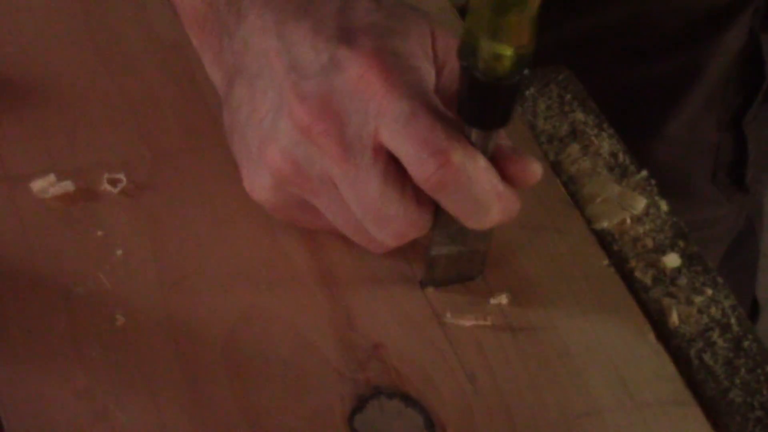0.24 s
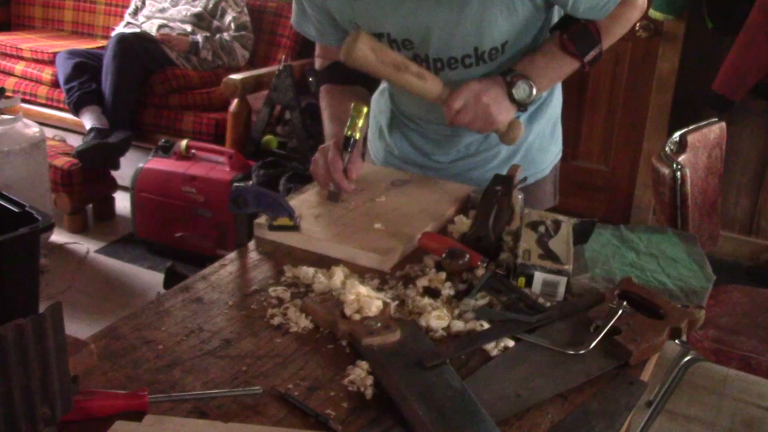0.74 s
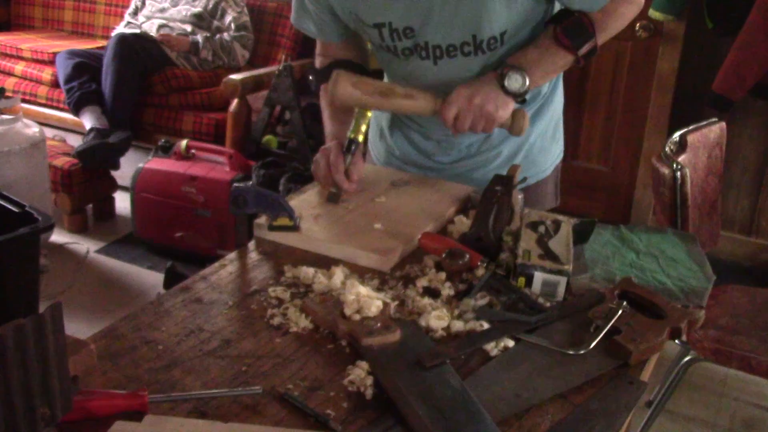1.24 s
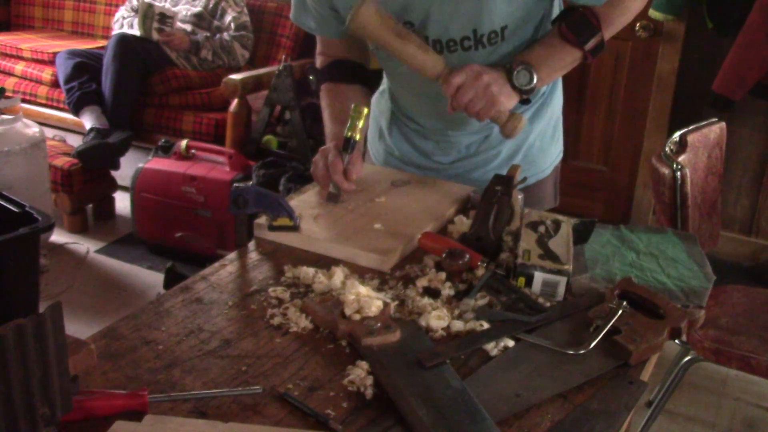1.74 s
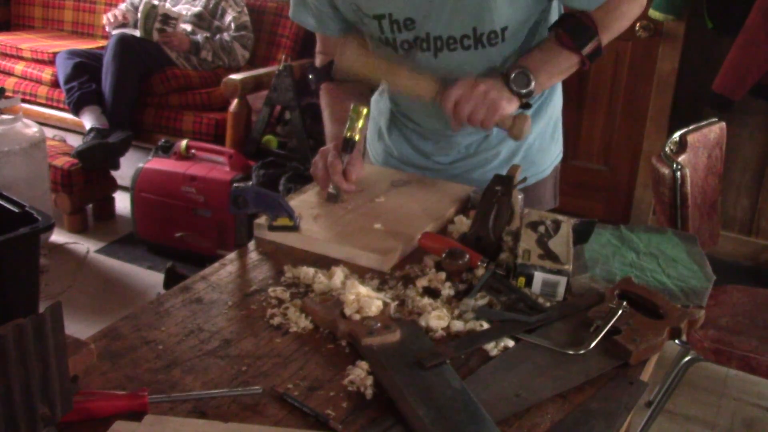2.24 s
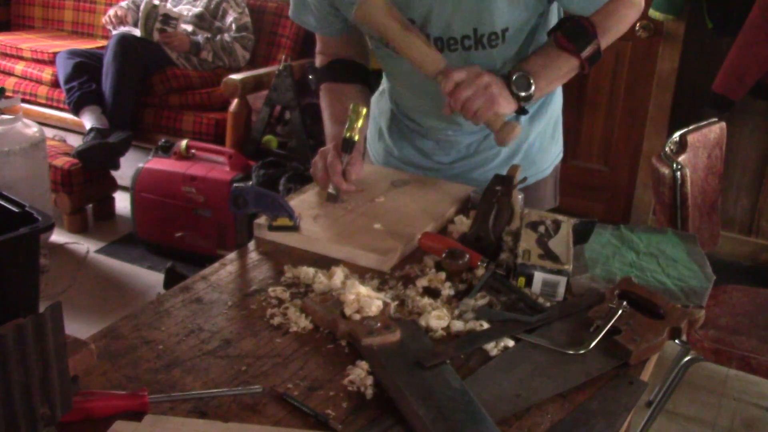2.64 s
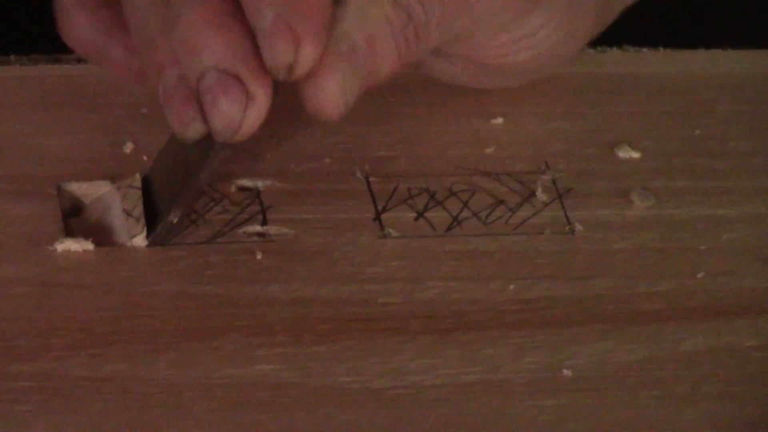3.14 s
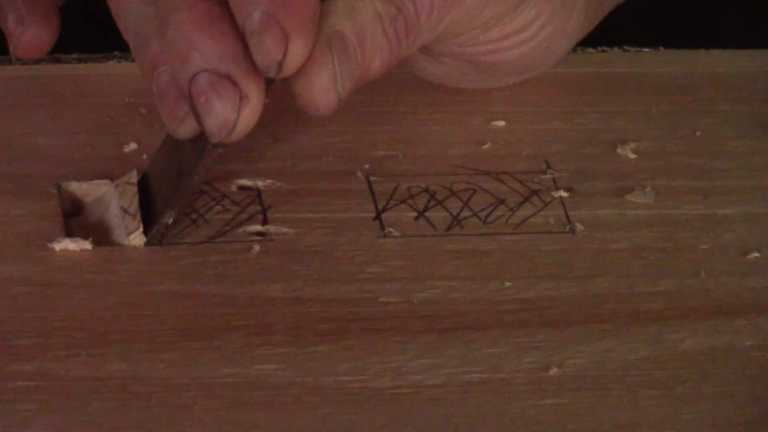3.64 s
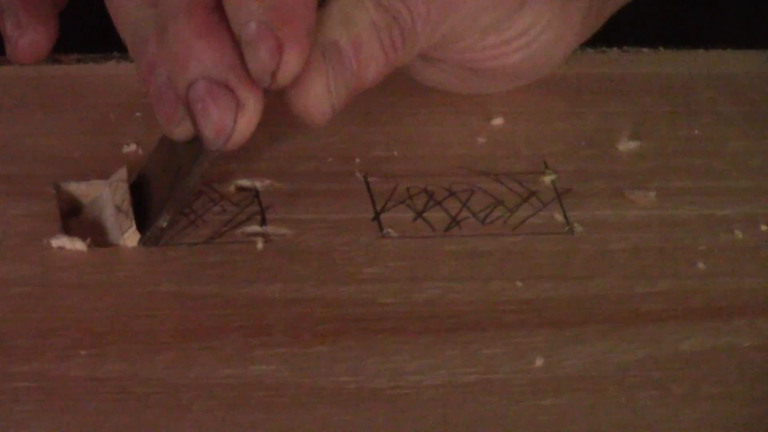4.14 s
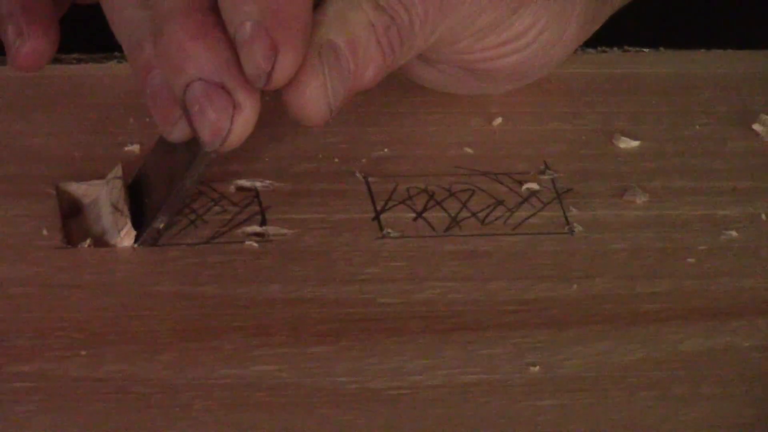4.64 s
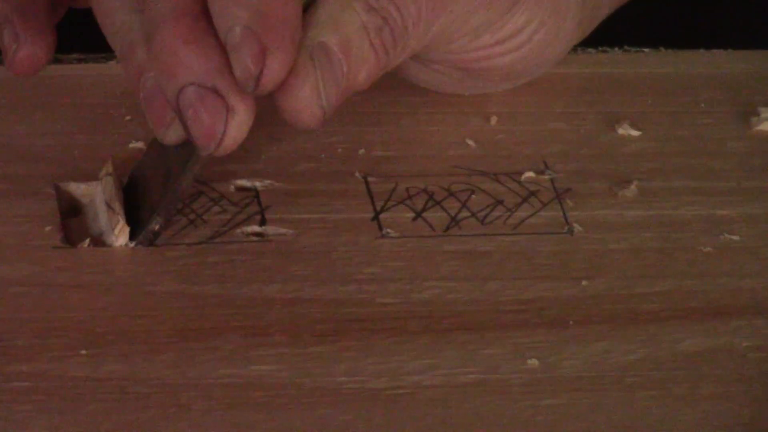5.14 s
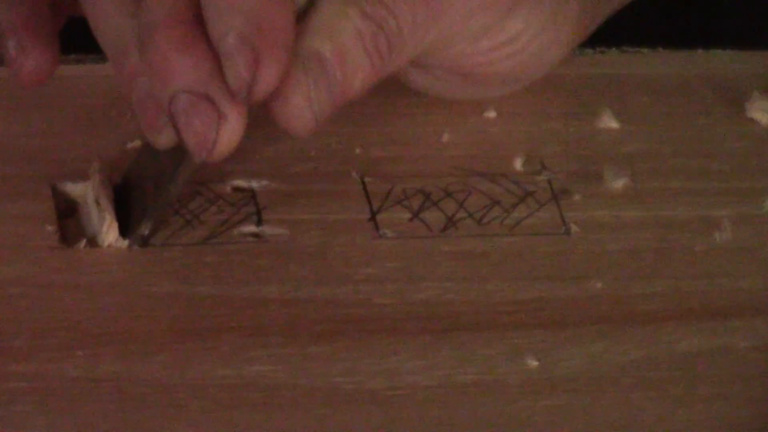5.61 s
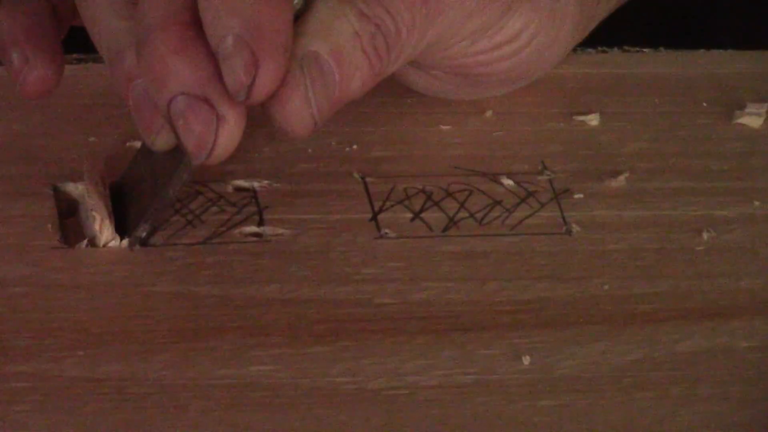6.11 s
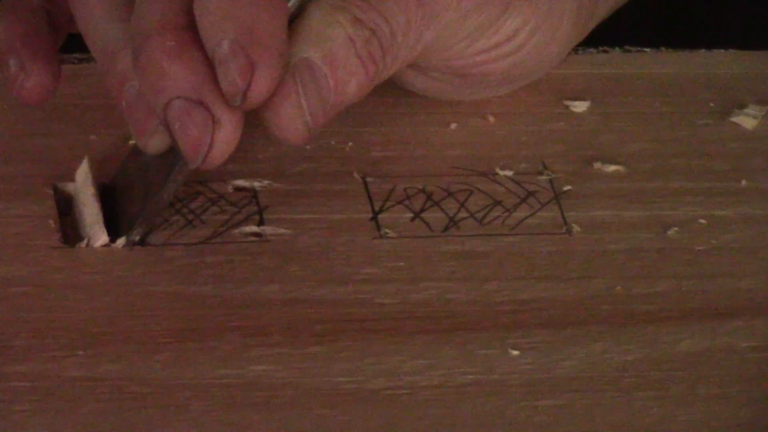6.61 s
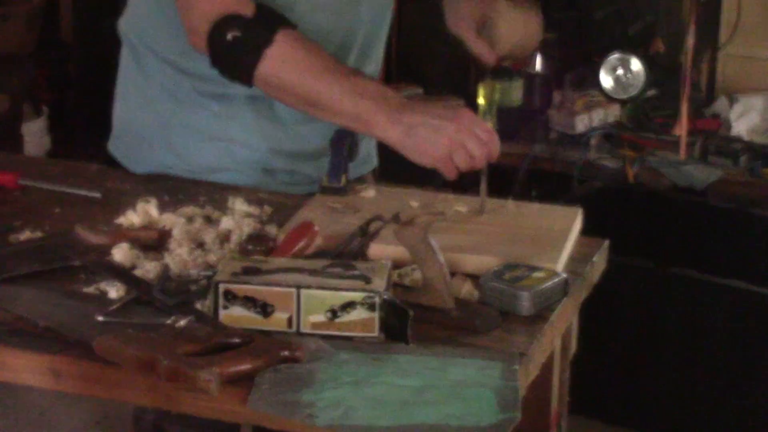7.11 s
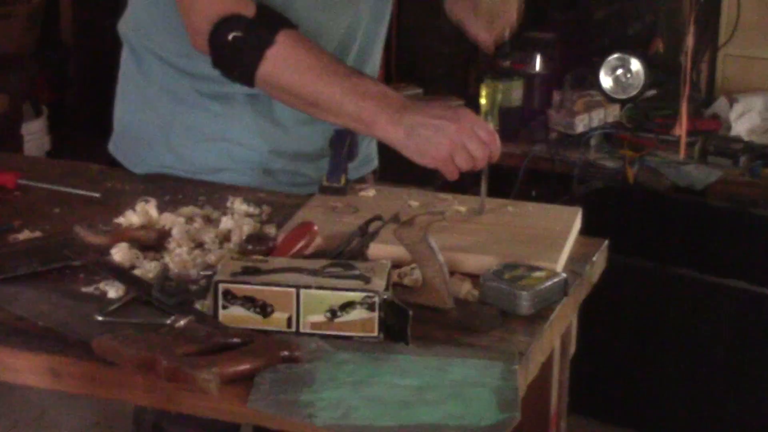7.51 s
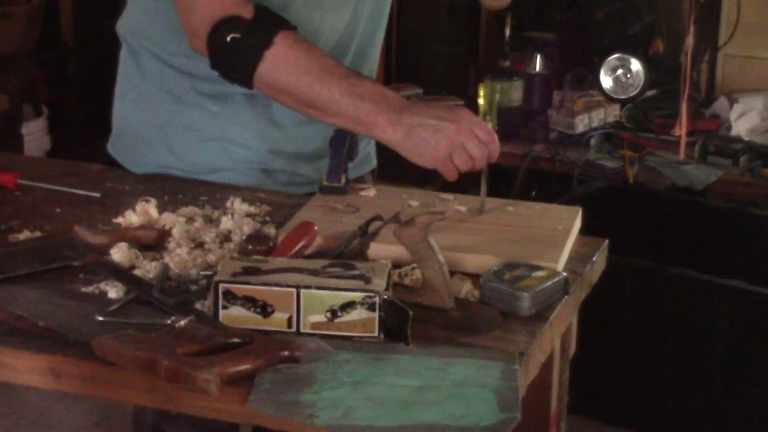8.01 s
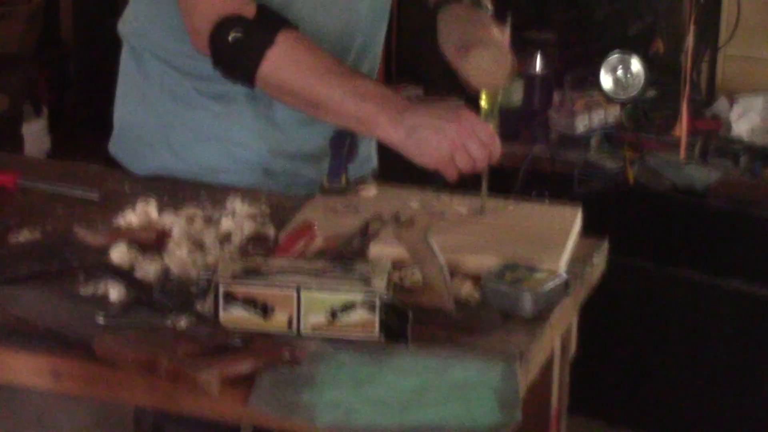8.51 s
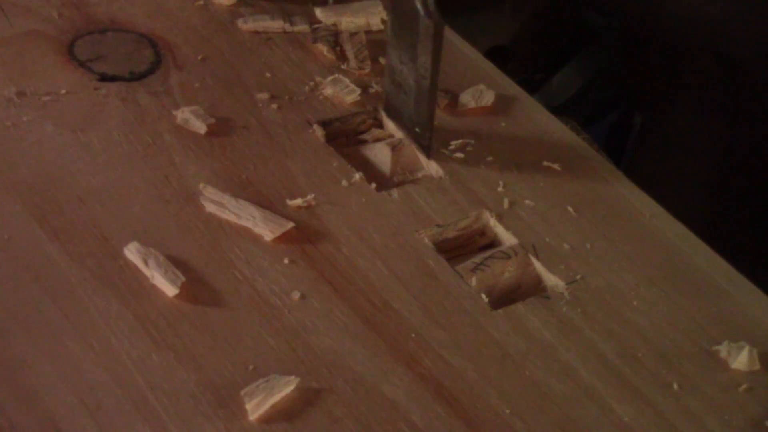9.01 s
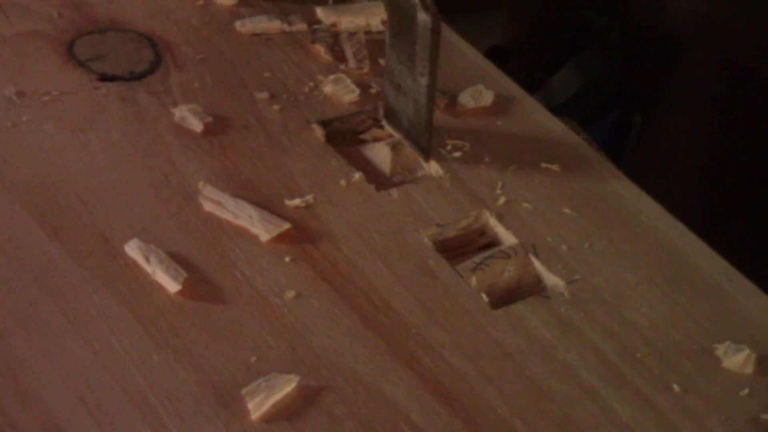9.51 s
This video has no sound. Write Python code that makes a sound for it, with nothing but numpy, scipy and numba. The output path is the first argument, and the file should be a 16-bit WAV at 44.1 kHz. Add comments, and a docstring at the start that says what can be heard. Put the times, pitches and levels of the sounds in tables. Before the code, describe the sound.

Rapid steady chisel blows on wood in a small workshop, each a sharp crack and knock, the perspective shifting several times.

```python
"""Hard wooden cracks, about three a second, each with a board knock, a steely rattle and a short room ring.
A mallet drives a chisel into a board on a cluttered bench, heard from five places in turn in a small workshop.
Blows are damped modes, noise bursts and decaying echoes; small snaps, a low room noise and a faint hiss fill in.
A fast gain control still lets the first milliseconds clip, then holds the ring level until it dies away."""
import sys
import numpy as np
from scipy import signal
from scipy.fft import rfft, irfft, next_fast_len
from scipy.io import wavfile
from numba import njit

SR = 44100
rng = np.random.default_rng(int(sys.argv[2]) if len(sys.argv) > 2 else 0)


def dump(signal):
    """Clip the signal to [-1, 1] and save it as 16-bit WAV at the path in sys.argv[1]."""
    limited = np.clip(np.atleast_2d(signal).T, -1, 1)
    pcm = np.round(limited * 32767).astype(np.int16)
    wavfile.write(sys.argv[1], SR, pcm)


N = 430416

# mallet blows: (time [s], relative strength [dB], handle knock [dB], bite of the edge [dB], first impact [dB])
BLOWS = [(-0.05, -4.5, -1, 1.5, -2), (0.268, -6, -1.5, 0.5, -3), (0.910, -9, -1.5, -1.5, 7),
         (1.222, -8.5, -1.5, 0.2, -3), (1.5638, -7.5, -1.5, 3, 3), (1.868, -6.5, 0, -0.5, 5),
         (2.171, -6.5, -4, -1.7, -5), (2.476, -7, -2, 0.7, -5.5), (2.758, -8.5, -0.5, 1.5, 2),
         (3.045, -19, -5, -1, -11), (3.144, -6.5, 4.5, -5.5, -1), (3.4748, -3.5, 0, 1.5, -2),
         (3.7785, -1.5, -0.5, 0.3, 4), (4.1216, -3, 0, 1, 0.5), (4.4166, -0.5, 0.5, 0, 6),
         (4.6905, -0.5, -1, -.3, 4), (5.0043, -2, -1, -1.9, -1), (5.302, -1.5, 3, -.2, 2.5),
         (5.5947, -1.5, -1, -0.9, 2.5), (5.899, 0, -0.5, -0.5, 4), (6.1815, -9.5, -0.5, 0, 12.5),
         (6.442, -9.5, -3, -0.4, 11.5), (6.689, -8.5, -4.5, -.3, -5.5), (7.069, -1.5, -2, -2.5, -12),
         (7.422, 1, 0.5, 1, 3.5), (7.791, 4, 0, 0.5, 6), (8.1657, 0.5, 2.5, 2, -5.5),
         (8.528, 7, -0.5, 0, 5), (9.14, -1.5, 2, 1.5, 1), (9.442, -1.5, 2.5, 1.5, -3.5),
         (9.7396, 4, 15, 4, 5.5)]
# changes of listening place: (time [s])
MOVE_TIMES_S = [.72, 2.98, 7.0, 9.0]
# outline of the bench and room ring at each place: (frequency [Hz], relative level [dB])
AT_HAND = [(35, -70), (60, -47), (98, -24.5), (136, -30), (168, -19.5), (469, -5), (527, -3.5), (842, -7.5),
           (1340, -3.5), (2350, -17), (3340, -21), (10500, -49.5), (16000, -70)]
# same columns: (frequency [Hz], relative level [dB])
ACROSS_BENCH = [(35, -68), (60, -44), (76, -27), (168, -15), (301, -5), (492, -5.5), (553, 1.5), (607, -6),
                (666, -1.5), (924, 0), (2140, -14), (6430, -32), (7750, -39.5), (8510, -36.5), (16000, -61)]
# same columns: (frequency [Hz], relative level [dB])
OVER_MORTISE = [(35, -65), (60, -31), (98, -21.5), (160, -18.5), (287, -1.5), (389, -4), (553, 1.5),
                (715, -6), (803, 0), (1250, -1.5), (1620, -8), (2350, -12.5), (4320, -23), (7400, -32),
                (16000, -58)]
# same columns: (frequency [Hz], relative level [dB])
BENCH_END = [(60, -42), (100, -22), (170, -21), (210, -26), (235, -20), (307, -5), (423, -4), (553, -0.5),
             (619, -5), (1160, -3), (2340, -13.5), (4830, -23), (7620, -35), (9220, -34), (13700, -47),
             (16000, -53)]
# same columns: (frequency [Hz], relative level [dB])
BOARD_EDGE = [(35, -52), (60, -35), (180, -7.5), (262, -7), (380, 0.5), (417, -16), (458, -1), (527, 0.5),
              (968, 0), (1310, -5.5), (9790, -38), (14600, -47), (16000, -55)]
# one row a place: (nominal ring t60 [s], board knock [dB], knock pitch [ratio], edge crack [dB],
#                   tool rattle [dB], bench thud [dB], blow level [dB])
PLACES = [(0.51, 8, 1.1, 1.5, -23.5, -34, 4.5), (0.48, 8, .97, -25, -16, -10, -.5),
          (0.5, 7, 1.03, 1, -17.5, -21, -4), (.47, -8.5, 0.313, -5.5, -21.5, -42, -1),
          (0.43, 5.5, 0.978, -5.5, -27, -23, -4)]
# ring time by pitch: (frequency [Hz], share of the nominal t60 [ratio])
RING_SHARES = [(100, 1.21), (300, 0.97), (800, 0.93), (2000, 0.95), (5000, 1.028), (14000, 0.95)]
# lingering modes of the board on the bench: (nominal frequency [Hz], t60 [s], relative level [dB])
BOARD_MODES = [(208, 0.33, -26.5), (435.6, 0.33, -14), (568.4, 0.45, -16), (945, 0.51, -18.5),
               (1210, 0.36, -11.5)]
# the board's quickly damped knock: (frequency before pitch ratio [Hz], t60 [s], relative level [dB])
KNOCK_MODES = [(409, 0.042, -3.5), (536, 0.071, -7.5), (797, 0.027, 6.5), (988, 0.034, 6.5),
               (1295, 0.03, -2.5), (1540, 0.016, -6.5)]
# crack of mallet, handle and blade: (nominal frequency [Hz], t60 [s], relative level [dB])
CRACK_MODES = [(1970, 0.019, -10), (2540, 0.0077, -3.5), (3286, 0.019, -3.5), (4645, 0.0077, -3),
               (5570, 0.018, -6.5), (7500, 0.0063, -21), (10900, 0.006, -11.5)]
# loose steel tools on the bench: (nominal frequency [Hz], t60 [s], relative level [dB])
TOOL_MODES = [(2380, .3, -1), (2594, 0.25, 5.5), (3570, 0.19, -1), (3860, 0.15, -5), (4280, 0.27, -3.5),
              (4780, 0.15, 1), (5300, 0.14, -3), (5830, 0.14, 1), (6270, 0.15, -7.5), (6840, 0.17, -2.5),
              (7260, 0.25, -18), (7260, 0.19, -10), (8170, 0.16, -9), (9000, 0.19, -23), (9800, 0.21, -10),
              (10200, .2, -13), (12600, .15, -17)]
# heavy bench top: (nominal frequency [Hz], t60 [s], relative level [dB])
THUD_MODES = [(48, 0.074, -4), (189.7, 0.21, -2.5), (227.5, 0.16, 5)]
# chips snapping, taps, faint rings: (time [s], level [dB], centre [Hz], width [octaves], main t60 [s])
CHIPS = [(.536, -56, 7000, 1.3, 0.17), (.536, -45, 2120, 0.23, .5), (.57, -41, 550, 1.4, 0.64),
         (0.674, -48, 2466, 2.1, .07), (.974, -25, 7500, 1.1, .015), (1.003, -32, 6300, 0.78, .025),
         (1.66, -26, 7000, 0.98, 0.029), (5.858, -33.5, 450, 1.1, .12), (6.577, -42, 6900, 0.47, 0.022),
         (6.61, -56, 7500, 1.2, .03), (6.678, -51, 3500, 1.4, .03), (7.163, -32, 8500, 1.4, .04),
         (8.82, -61, 5470, .12, 1.4), (8.82, -65, 8640, .08, 1.8), (8.95, -36, 590, 1.5, 0.1)]
# outline of the workshop background: (frequency [Hz], relative level [dB])
SHOP_OUTLINE = [(25, -17), (60, -8), (100, 2.5), (160, 1), (330, 5), (700, -3), (1500, -13), (4000, -22),
                (10000, -34), (16000, -47)]
# background at each place, ahead of the gain control: (level [dB])
SHOP_LEVELS_DB = [-41.5, -48, -48.5, -43.5, -45]
# swells of faint high hiss: (time [s], length [s], peak level [dB])
HISS_SWELLS = [(0.715, 0.21, -55.5), (8.76, 0.78, -59)]

T = np.arange(int(.8 * SR)) / SR  # time since a blow [s]
SPLINTER_DB_PER_BITE_DB, BODY_DB_PER_BITE_DB = 1.63, 0.83  # a deeper bite splinters and loads the board more
BODY_DB = -.7  # bench body at zero bite
EXTRA_DECAY_PER_IMPACT_DB = 0.0081  # share of the nominal decay rate
CEILING, TOP_HZ = .235, 16200


def chiselling():
    """All the blows, each through the echoes of the place from which it is heard."""
    out = np.zeros((2, N))
    outlines = [AT_HAND, ACROSS_BENCH, OVER_MORTISE, BENCH_END, BOARD_EDGE]
    echoes = [reflections(place[0]) for place in PLACES]
    for time_s, *blow in BLOWS:
        k = np.searchsorted(MOVE_TIMES_S, time_s)
        add(out, time_s, chop(PLACES[k], outlines[k], echoes[k], blow))
    return out


def chop(place, outline, echoes, blow):
    """One blow: the edge cracks into the fibres, the board knocks, tools rattle, bench and room ring on."""
    t60_s, knock_db, pitch, crack_db, rattle_db, thud_db, level_db = place
    strength_db, handle_db, bite_db, impact_db = blow
    mid, side = bench_and_room(t60_s, outline, echoes, impact_db)
    mid = mid + board_and_bench(knock_db + 0.15 * impact_db, pitch, thud_db)
    mid = mid + undb(crack_db + impact_db) * edge_crack()
    mid = mid + undb(rattle_db) * rattle()
    body_db = BODY_DB + BODY_DB_PER_BITE_DB * bite_db
    splinter_db = SPLINTER_DB_PER_BITE_DB * bite_db
    tone = [(80, 0), (320, body_db), (850, 0), (1600, handle_db),
            (2500, bite_db), (4800, bite_db), (10000, splinter_db)]
    return undb(strength_db + level_db) * colour(stereo(mid, side), tone)


def edge_crack(tear_db=1):
    """Fast-damped modes of mallet, handle and blade, with a noise burst as the fibres tear."""
    tear = undb(tear_db) * band_noise(2440, octaves=0.72) * fade(0.014)
    onset = 1 - np.exp(-T / 0.00045)
    return (modes(CRACK_MODES, jitter=0.0049) + tear) * onset


def board_and_bench(knock_db, pitch, thud_db):
    """Knock, thud and lingering modes; the heavy board starts to move a moment after the blade."""
    knock = undb(knock_db) * modes(KNOCK_MODES, pitch, jitter=0.032)
    thud = undb(thud_db) * modes(THUD_MODES, jitter=0.035)
    onset = 1 - np.exp(-T / 0.0035)
    return (knock + thud + modes(BOARD_MODES)) * onset


def rattle(bounce_s=0.014, scatter_db=4, clink_db=8, clink_t60_s=0.067, count=36):
    """The blow lifts the loose tools; they land and chatter some tens of milliseconds later."""
    landings = np.zeros(len(T))
    delays_s = rng.gamma(4, 1, count) * bounce_s
    when = np.minimum(delays_s * SR, len(T) - 1).astype(int)
    landings[when] = undb(scatter_db * rng.standard_normal(count)) * rng.choice([-1, 1], count)
    landings /= np.linalg.norm(landings)
    steel = modes(TOOL_MODES, jitter=0.01196)
    clink = undb(clink_db) * band_noise(5800, octaves=1.43) * fade(clink_t60_s)
    return signal.fftconvolve(landings, steel + clink)[:len(T)] / np.sqrt(len(TOOL_MODES))


def bench_and_room(t60_s, outline, echoes, impact_db, fresh=0.31):
    """Mid and side ring: echo paths stay from blow to blow, but the changing cut renews a part."""
    ring = np.sqrt(1 - fresh) * echoes + np.sqrt(fresh) * reflections(t60_s)
    # a sharp first impact spends the blow in the cut, so the ring is shorter
    ring = ring * fade(t60_s) ** (EXTRA_DECAY_PER_IMPACT_DB * impact_db)
    spread = np.linalg.norm(colour(signal.unit_impulse(len(T)), outline))
    return colour(ring, outline) / spread


def reflections(t60_s):
    """Dense echoes as decaying noise, mid and side; the bass lingers longest."""
    hz, share = np.transpose(RING_SHARES)
    spectrum = rfft(rng.standard_normal((2, len(T))))
    log_f = np.log(np.maximum(np.fft.rfftfreq(len(T), 1 / SR), 1))
    echoes = np.zeros((2, len(T)))
    # overlapping bands, each with its own decay
    for peak, k in zip(np.eye(len(hz)), share):
        weight = np.interp(log_f, np.log(hz), peak)
        echoes += irfft(spectrum * weight) * fade(t60_s * k)
    return echoes


def chips():
    """Short snaps, taps and rings: band noise with a little room decay behind it."""
    out = np.zeros((2, N))
    for time_s, db, hz, width, t60_s in CHIPS:
        decay = fade(t60_s) + undb(-33) * fade(0.36)
        add(out, time_s, undb(db) * band_noise(hz, width) * decay)
    return out


def workshop():
    """Low room noise, steady at each place, and a faint hiss that swells and fades."""
    t = np.arange(N) / SR
    level_db = np.asarray(SHOP_LEVELS_DB)[np.searchsorted(MOVE_TIMES_S, t)]
    room = unit(colour(rng.standard_normal((2, N)), SHOP_OUTLINE)) * undb(level_db)
    hiss_outline = [(1000, -28), (6000, -9), (8600, -9), (10000, -4), (10900, -15), (16000, -22)]
    hiss = unit(colour(rng.standard_normal(N), hiss_outline))
    swells = np.zeros(N)
    for start_s, length_s, db in HISS_SWELLS:
        swells += undb(db) * np.sin(np.pi * np.clip((t - start_s) / length_s, 0, 1))
    return stereo(room[0] + hiss * swells, room[1])


def modes(rows, pitch=1, jitter=0.0059):
    """Sum of damped partials, each a little off its nominal pitch at every call."""
    total = np.zeros(len(T))
    for hz, t60_s, db in rows:
        actual_hz = hz * pitch * (1 + jitter * rng.standard_normal())
        total += undb(db) * np.cos(2 * np.pi * actual_hz * T) * fade(t60_s)
    return total


def band_noise(hz, octaves, size=len(T)):
    """Noise near rms 1 in a broad resonance."""
    edges = hz * 2 ** (np.array([-.5, .5]) * octaves)
    edges = np.minimum(edges, [.4 * SR, .48 * SR])
    band = signal.butter(2, edges, "band", fs=SR, output="sos")
    lead_in = 999  # dropped while the filter settles
    return unit(signal.sosfilt(band, rng.standard_normal(size + lead_in)))[lead_in:]


def fade(t60_s):
    """Exponential free decay, 60 dB down at t60."""
    return np.exp(-np.log(1000) * T / t60_s)


def stereo(mid, side):
    """Two close capsules: they differ chiefly in the treble."""
    side = colour(side, [(250, -34), (1000, -23.5), (2500, -16.5), (14000, -13.5)])
    return np.array([mid + side, mid - side])


def colour(x, rows):
    """Causal minimum-phase filter with the given (frequency [Hz], gain [dB]) outline."""
    size = next_fast_len(x.shape[-1] + 4096, True)
    size += size % 2
    hz, db = np.transpose(rows)
    f = np.maximum(np.fft.rfftfreq(size, 1 / SR), 1)
    gain = undb(np.interp(np.log(f), np.log(hz), db))
    # folding the cepstrum forward in time gives minimum phase
    cepstrum = irfft(np.log(gain))
    cepstrum[1:size // 2] *= 2
    cepstrum[size // 2 + 1:] = 0
    return irfft(rfft(x, size) * np.exp(rfft(cepstrum)))[..., :x.shape[-1]]


def add(out, time_s, sound):
    """Mix a sound in at a time, trimmed to the output."""
    start = int(round(time_s * SR))
    a, b = max(start, 0), min(start + sound.shape[-1], N)
    out[:, a:b] += sound[..., a - start:b - start]


def undb(db):
    """Decibels to gain."""
    return 10 ** (np.asarray(db) / 20)


def unit(x):
    """Scale to rms 1."""
    return x / np.sqrt(np.mean(x ** 2))


def scene():
    """Blows, chips and room noise at the microphone."""
    return chiselling() + chips() + workshop()


@njit
def follow(over_db, attack, release_db):
    """Gain reduction [dB]: closes in on an overshoot, recovers by a fixed step a sample."""
    cut_db, c = np.empty(len(over_db)), over_db[:200].max()
    for i in range(len(over_db)):
        if over_db[i] > c:
            c = c + (over_db[i] - c) * attack
        else:
            c = max(c - release_db, 0.)
        cut_db[i] = c
    return cut_db


def record(dry, hold_db=-15.5, knee_db=3.5, attack_s=0.00057, recovery_db_per_s=260, balance_db=0.4):
    """Fast gain control that still lets the first milliseconds overload; then both range ends are cut."""
    over_db = 20 * np.log10(np.abs(dry).max(axis=0) + 1e-9) - hold_db
    # soft knee: the held level bends gently into the free decay
    over_db = knee_db * np.logaddexp(0, over_db / knee_db)
    cut_db = follow(over_db, 1 / (attack_s * SR), recovery_db_per_s / SR)
    channel_db = np.array([[balance_db], [-balance_db]]) / 2
    held = dry * undb(channel_db - cut_db)
    # flatten whatever nears the ceiling
    flattened = held / (1 + (held / CEILING) ** 8) ** (1 / 8)
    voiced = colour(flattened, [(20, -8), (50, -3), (100, 0), (12000, 0), (16000, -1)])
    lowpass = signal.ellip(8, .2, 70, TOP_HZ, fs=SR, output="sos")
    return signal.sosfilt(lowpass, voiced)


dry = scene()
out = record(dry)
dump(out)
```